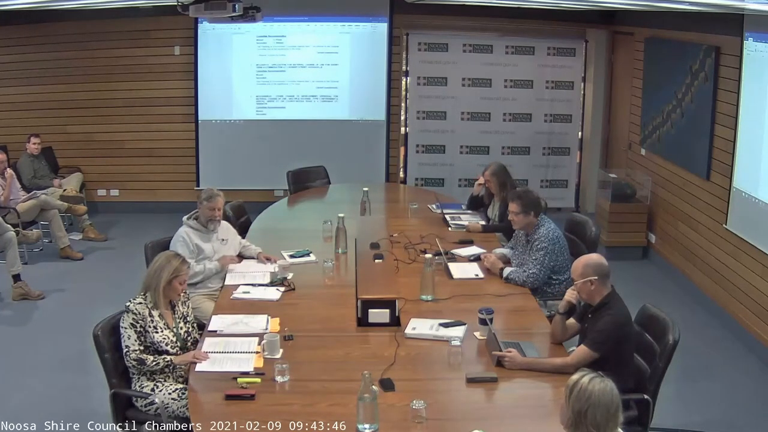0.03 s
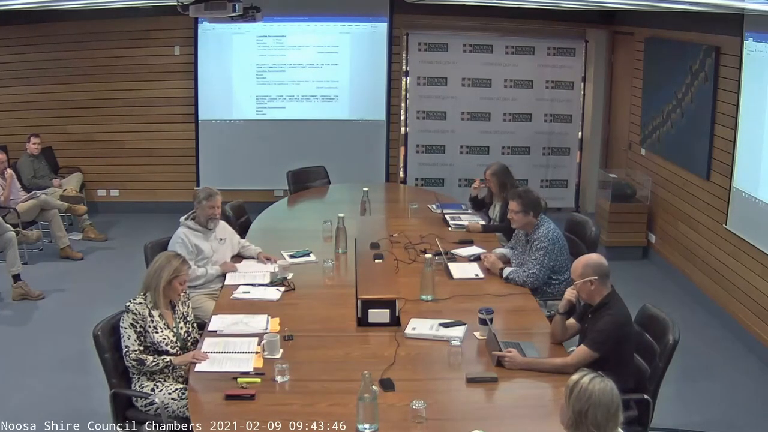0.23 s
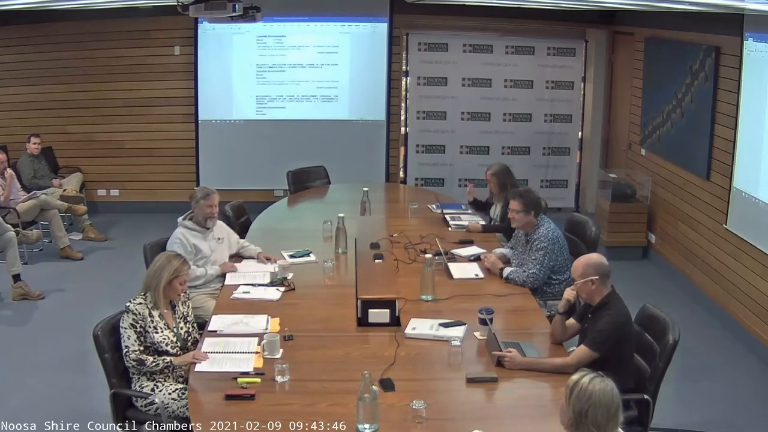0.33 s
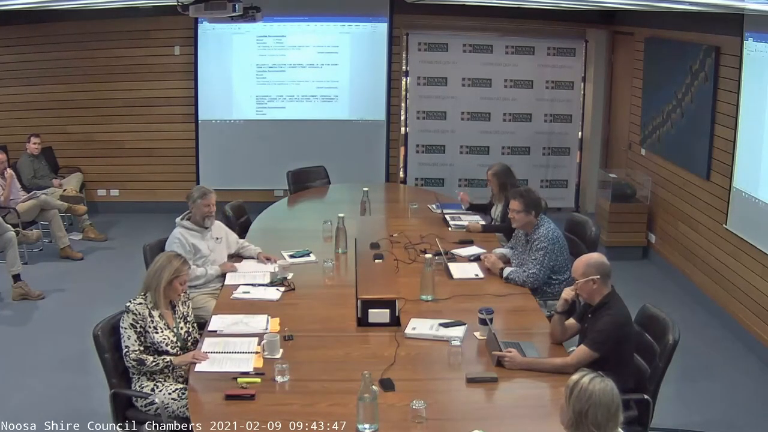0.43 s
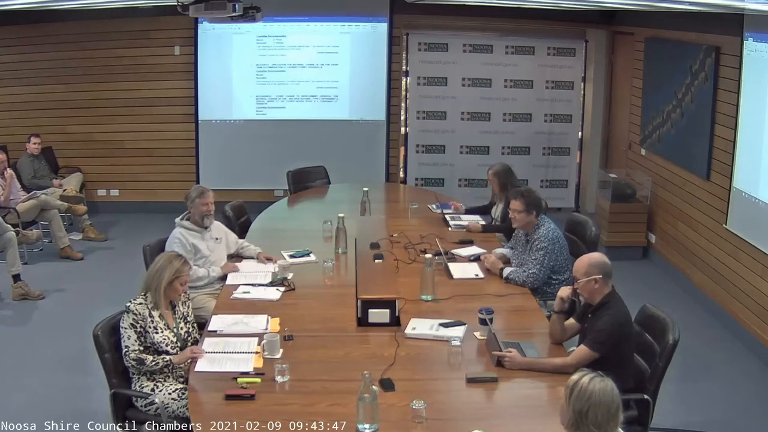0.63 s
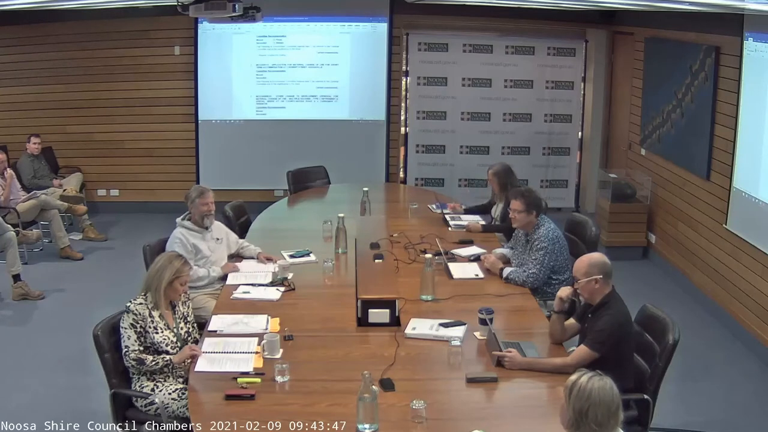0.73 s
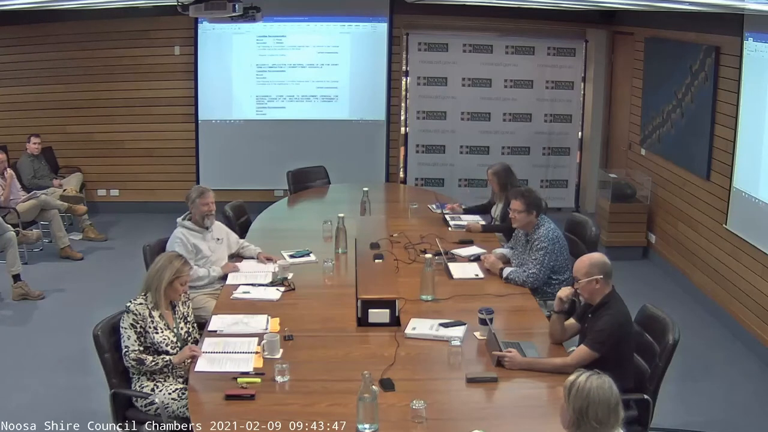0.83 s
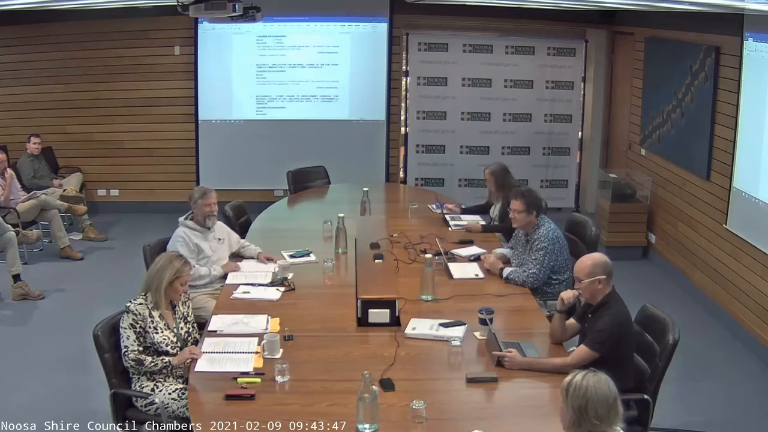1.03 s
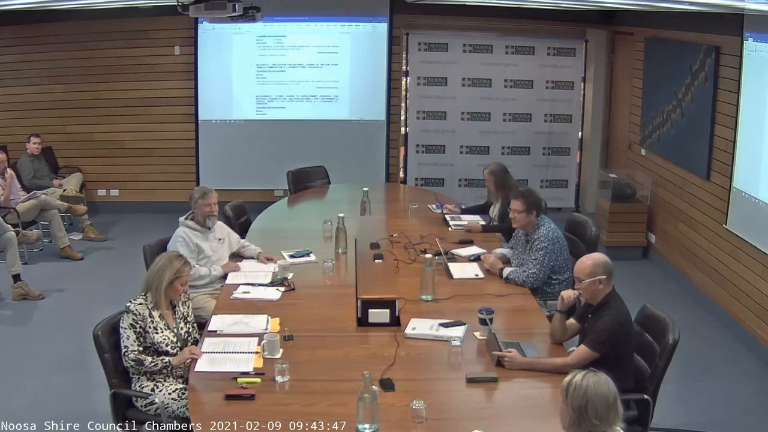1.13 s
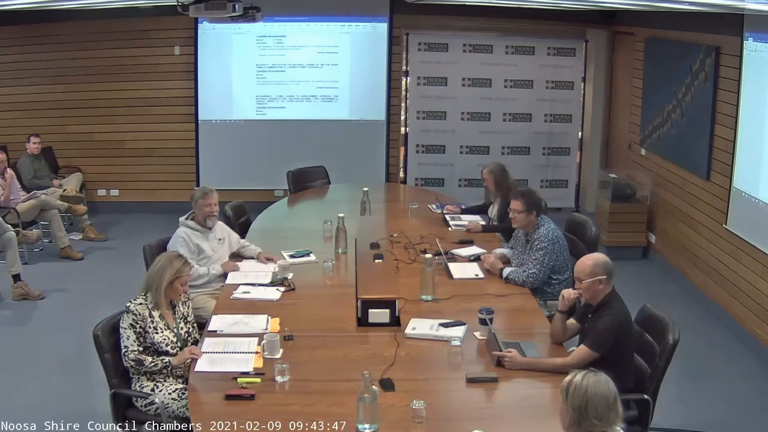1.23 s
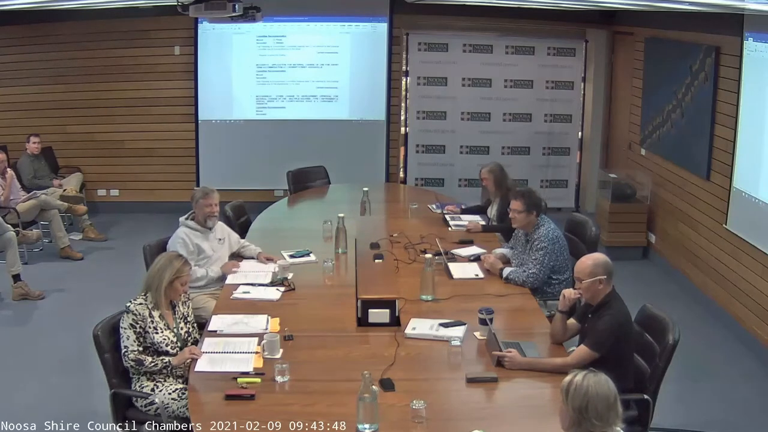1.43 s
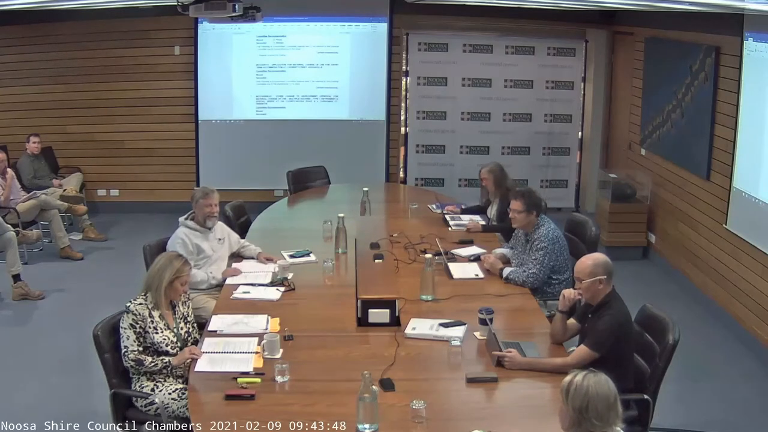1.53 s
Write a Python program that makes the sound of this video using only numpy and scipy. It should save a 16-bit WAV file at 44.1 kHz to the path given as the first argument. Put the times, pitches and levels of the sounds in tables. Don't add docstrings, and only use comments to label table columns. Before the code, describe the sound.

Paper pages handled close to the microphone in a panelled meeting room: a dull hand rub, a burst of sharp crackles as a page buckles and flops, a raspy slide, then a soft tap and scrape.

```python
import sys
import numpy as np
from scipy import signal
from scipy.fft import rfft, irfft
from scipy.io import wavfile
from scipy.ndimage import uniform_filter1d

SR = 44100
rng = np.random.default_rng(int(sys.argv[2]) if len(sys.argv) > 2 else 0)


def decibels_to_gain(level_db):
    exponent = np.asarray(level_db, float) / 20
    return 10 ** exponent


def unload_wav(signal):
    wavfile.write(
        sys.argv[1],
        SR,
        np.round(np.clip(np.atleast_2d(signal).T, -1, 1) * 32767).astype(np.int16),
    )


N = 70560

EDGES = 12 * 2 ** np.arange(0, 10.6, 1 / 3)
CENTRES = np.sqrt(EDGES[1:] * EDGES[:-1])

# f/Hz, density/dB per Hz
CREASE_COLOUR = [(150, -52.5), (250, -18), (760, 0.5), (1640, -9.5), (2050, -2), (4300, -7), (5200, -11),
                 (7300, -10), (11000, -24.5), (15000, -38.5)]
# f/Hz, density/dB per Hz
PILE_COLOUR = [(240, -50), (500, -16.5), (1000, -0.5), (1360, -8.5), (1630, -2), (2480, -12), (5000, -15),
               (5700, -35.5), (7100, -34), (7700, -67)]
# f/Hz, density/dB per Hz
SLIDING_COLOUR = [(290, -35), (500, -10), (700, -19), (923, -2), (1300, -3.5), (2940, 1), (6500, -6),
                  (9480, -24), (12200, -25), (14000, -62)]


def at_hz(points, hz):
    points = np.array(points)
    return np.interp(np.log(hz), np.log(points[:, 0]), points[:, 1])


def rms_one(x):
    return x / np.sqrt(np.mean(x ** 2) + 1e-20)


def in_time(rows, column):
    rows = np.array(rows)
    return np.interp(np.arange(N) / SR, rows[:, 0], rows[:, column], left=-140, right=-140)


def swell(s, db, rise, fall_db):
    t = np.maximum(np.arange(N) / SR - s, 0)
    return decibels_to_gain(db - fall_db * t) * np.clip(t / rise, 0, 1)


def band(x, k):
    run_in = 8192
    sos = signal.butter(4, EDGES[k:k + 2], "band", fs=SR, output="sos")
    return signal.sosfilt(sos, np.concatenate([x[-run_in:], x]))[run_in:]


def bank(sources):
    return [band(sources[k % 2], k) for k in range(len(CENTRES))]


def drift(rate):
    step = 40
    r = np.exp(-2 * np.pi * rate * step / SR)
    white = rng.standard_normal(N // step + 2002)
    slow = signal.lfilter([1], [1, -2 * r, r * r], white)[2000:]
    return np.interp(np.arange(N) / step, np.arange(len(slow)), rms_one(slow))


def coloured(bands, colour, patchy_db=0, top_hz=SR):
    top_fall, shared_flicker = 48.5, .7
    out, power, together = 0, 0, drift(30)
    for k, hz in enumerate(CENTRES):
        if colour[0][0] <= hz <= colour[-1][0]:
            octaves_over = np.maximum(np.log2(hz / top_hz), 0)
            gain = decibels_to_gain(at_hz(colour, hz) - top_fall * octaves_over)
            flicker = decibels_to_gain(patchy_db * (shared_flicker * together + drift(38)))
            out = out + gain * flicker * bands[k]
            power = power + gain ** 2 * (EDGES[k + 1] - EDGES[k]) * 2 / SR
    return out / np.sqrt(power)


def sing(rows, width_hz):
    hz = np.interp(np.arange(N) / SR, *np.array(rows)[:, :2].T)
    carrier = np.exp(2j * np.pi * np.cumsum(hz) / SR)
    sos = signal.butter(2, width_hz / 2, fs=SR, output="sos")
    slow = signal.sosfilt(sos, rng.standard_normal((2, N)))
    tone = np.real((slow[0] + 1j * slow[1]) * carrier)
    return decibels_to_gain(in_time(rows, 2)) * rms_one(tone)


def snaps(rows, colour):
    boost_db, boost_width_oct = 9.5, 0.23
    evenness = .8
    crisp_db, crisp_hz, weak_dulling = -12, 5000, .7
    out, size = np.zeros(N + 2048), 1024
    t = np.arange(size) / SR
    hz = np.maximum(np.fft.rfftfreq(2 * size, 1 / SR), 20)
    for (s, db, pitch_hz, length), noise in zip(rows, rng.standard_normal((len(rows), size))):
        off_pitch = np.log2(hz / pitch_hz) / boost_width_oct
        level = at_hz(colour, hz) + boost_db * np.exp(-.5 * off_pitch ** 2)
        raw = rfft(noise * t * np.exp(-2 * t / length), 2 * size)
        level = level - evenness * 10 * np.log10(uniform_filter1d(np.abs(raw) ** 2, size=9))
        octaves_over = np.maximum(np.log2(hz / max(crisp_hz, pitch_hz)), 0)
        level = level - weak_dulling * np.clip(crisp_db - db, 0, 20) * octaves_over
        cepstrum = irfft(level * np.log(10) / 20)
        cepstrum[1:size] *= 2
        cepstrum[size + 1:] = 0
        burst = irfft(raw * np.exp(rfft(cepstrum)))
        start = int(s * SR)
        out[start:start + 2 * size] += decibels_to_gain(db) * burst / np.abs(burst).max()
    return out[:N]


def grains():
    clicks_per_s, spread_db, click_share = 3800, 4, 0.19
    sizes = decibels_to_gain(spread_db * np.minimum(rng.exponential(1, N), 5)) * rng.choice([-1, 1], N)
    clicks = rms_one(sizes * (rng.random(N) < clicks_per_s / SR))
    return np.sqrt(click_share) * clicks + np.sqrt(1 - click_share) * rng.standard_normal((2, N))


def ventilation(noise):
    # t/s, level/dB
    rumble_curve = [(0, -43), (.04, -48.5), (.12, -51), (.226, -59), (.3, -53.5), (.53, -55.5), (.64, -61),
                    (.78, -53), (.91, -54), (1.0, -52), (1.06, -51.5), (1.2, -60.5), (1.5, -51), (1.6, -50)]
    # f/Hz, density/dB per Hz
    rumble_colour = [(16, -30), (24, -8), (36, 3), (70, -11), (130, -21), (236, -31), (400, -42),
                     (700, -60)]
    # f/Hz, density/dB per Hz
    hiss_colour = [(180, -36), (300, -8), (990, -20), (1500, -28), (6000, -49), (9000, -38.5), (15000, -47)]
    rumble = decibels_to_gain(in_time(rumble_curve, 1)) * coloured(noise, rumble_colour)
    return rumble + decibels_to_gain(-79.5) * coloured(noise, hiss_colour, patchy_db=.4)


def first_rub(noise):
    # t/s, level/dB
    rub_curve = [(0.0, -52), (0.052, -51), (0.138, -69.5), (.17, -70), (.21, -71)]
    # f/Hz, density/dB per Hz
    rub_colour = [(100, -23), (200, -2.5), (600, -8.5), (1000, -0.5), (1500, -6.5), (2100, -18),
                  (3560, -33), (6500, -40.5), (8000, -67)]
    return decibels_to_gain(in_time(rub_curve, 1)) * coloured(noise, rub_colour)


def flick(texture):
    # t/s, level/dB
    flick_curve = [(.098, -106), (.118, -60.5), (.135, -54.5), (.15, -67), (.2, -75.5), (.212, -77.5)]
    # f/Hz, density/dB per Hz
    flick_colour = [(1290, -49.5), (2200, -10), (2820, -15.5), (3890, -7.5), (9180, -2), (12700, -8.5),
                    (15000, -44.5)]
    return decibels_to_gain(in_time(flick_curve, 1)) * coloured(texture, flick_colour, patchy_db=0.5)


def bend(noise):
    # t/s, level/dB
    bend_curve = [(.13, -80), (0.156, -64.5), (0.206, -58.5), (.215, -53)]
    return decibels_to_gain(in_time(bend_curve, 1)) * coloured(noise, PILE_COLOUR)


def crease_snaps():
    # t/s, peak level/dB, main pitch f/Hz, burst length/s
    crease_events = [(.2129, -15, 3840, 0.0019), (.2151, -12.5, 4200, 0.0014), (.2152, -19.5, 1030, 0.0038),
                     (.2222, -21.5, 990, 0.0028), (.2228, -24.5, 3900, 0.0033),
                     (.2270, -33.5, 2900, 0.0011), (.2315, -23.5, 4200, 0.0022),
                     (.2345, -14.5, 4220, 0.0017), (.2388, -16.5, 1480, 0.0019), (.2460, -27, 950, 0.00093),
                     (.2500, -29.5, 2980, 0.00093), (.2600, -18, 3900, 0.0019), (.2645, -31, 3800, 0.0029),
                     (.2695, -32.5, 2250, 0.0012), (.2736, -22, 5940, 0.0016), (.2800, -34, 4000, 0.0036),
                     (.2965, -30.5, 4100, 0.003), (.3030, -29, 3600, 0.002), (.352, -36.5, 4060, 0.0067)]
    return snaps(crease_events, CREASE_COLOUR)


def crumple(texture):
    # t/s, level/dB, rise/s, fall/dB per s
    after_snaps = (.214, -36, .003, 150)
    # t/s, level/dB, rise/s, fall/dB per s
    flop_swell = (.297, -40, .008, 220)
    # t/s, level/dB, rise/s, fall/dB per s
    after_tap = (1.411, -49, .003, 110)
    # f/Hz, density/dB per Hz
    flop_colour = [(130, -40), (220, -9), (400, 0), (700, -4), (950, -6), (1700, -6), (2500, -12),
                   (4000, -30)]
    since = np.clip(np.arange(N) / SR - after_snaps[0], 0, .25)
    top_hz = 15000 * 2 ** (-2.5 * since)
    creasing = swell(*after_snaps) * coloured(texture, CREASE_COLOUR, patchy_db=2.2, top_hz=top_hz)
    flop = swell(*flop_swell) * coloured(texture, flop_colour)
    settling = swell(*after_tap) * coloured(texture, PILE_COLOUR, patchy_db=2.2)
    return creasing + flop + settling


def flop_snaps():
    # t/s, peak level/dB, main pitch f/Hz, burst length/s
    flop_events = [(.2995, -34, 706, 0.0023), (.3035, -40, 1750, 0.0045), (.3040, -34, 377, 0.0056),
                   (.3095, -39.5, 1760, 0.005), (.3128, -36.5, 1010, 0.0019), (.3235, -42, 1390, .002),
                   (.328, -33, 1570, 0.0037), (.3315, -34, 1010, 0.0043), (.350, -36.5, 1740, 0.0022)]
    return snaps(flop_events, PILE_COLOUR)


def slide(texture):
    # t/s, level/dB, top of band f/Hz
    slide_curve = [(.582, -106, 7180), (.587, -75.5, 7100), (.645, -77, 6920), (.662, -61.5, 12500),
                   (.697, -55.5, 12500), (.78, -50.5, 12600), (.88, -50.5, 10000), (.96, -55.5, 8600),
                   (1.0, -60, 7760), (1.03, -54, 8840), (1.1, -57.5, 5250), (1.135, -65.5, 4620),
                   (1.2, -93, 4500), (1.24, -89, 3500)]
    # t/s, level/dB, top of band f/Hz
    settle_curve = [(1.245, -75, 3560), (1.291, -73.5, 3660), (1.3, -64.5, 12200), (1.35, -64, 9970),
                    (1.401, -65.5, 4500), (1.5, -90.5, 6500), (1.54, -91, 6800), (1.559, -59, 9500),
                    (1.6, -73, 9500)]
    # t/s, pitch f/Hz, level/dB
    start_squeak = [(.581, 1800, -95), (.586, 1794, -76.5), (.645, 1714, -75), (.66, 1680, -92)]
    # t/s, pitch f/Hz, level/dB
    sheet_song = [(.655, 2900, -92), (.665, 2900, -74), (.75, 2950, -77), (.78, 2850, -74),
                  (.83, 2900, -53), (.89, 2900, -55), (.93, 2880, -66), (1.0, 2850, -66)]
    points = slide_curve + settle_curve
    top_hz = np.interp(np.arange(N) / SR, *np.array(points)[:, [0, 2]].T)
    drag = decibels_to_gain(in_time(points, 1)) * coloured(texture, SLIDING_COLOUR, top_hz=top_hz)
    return drag + sing(sheet_song, width_hz=250) + sing(start_squeak, width_hz=110)


def catches():
    # t/s, peak level/dB
    catch_events = [(0.6615, -48.5), (0.6827, -51), (0.693, -42.5), (0.699, -51), (0.71, -49),
                    (0.7234, -41), (.7330, -57), (0.754, -42.5), (0.759, -55), (0.7847, -44.5),
                    (.7890, -61), (0.809, -42), (0.818, -49), (0.836, -48)]
    shape = sum(swell(s, db - 2, rise=0.0032, fall_db=13.4 / 0.009) for s, db in catch_events)
    soft = signal.lfilter(*signal.butter(2, 6500, fs=SR), rng.standard_normal(N))
    sos = signal.butter(6, [5030, 11700], "band", fs=SR, output="sos")
    return shape * rms_one(signal.sosfilt(sos, soft))


def fibre_snaps():
    # t/s, peak level/dB, main pitch f/Hz, burst length/s
    fibre_events = [(.691, -45, 4400, .003), (.703, -47, 4360, 0.0078), (.7128, -34, 8300, 0.00076),
                    (.7205, -44, 1070, 0.0037), (.7215, -41, 1740, 0.0017), (.7548, -41.5, 980, .002),
                    (.7715, -35.5, 910, 0.0058), (.7730, -46, 1720, .002), (.7825, -36.5, 5740, 0.0004),
                    (.8000, -46, 2380, 0.00037), (.8060, -47, 2400, 0.0012), (.8062, -39, 930, 0.0059),
                    (.827, -47, 2930, 0.0069), (.8665, -40, 2940, 0.00069), (.8670, -37, 1820, .002),
                    (.8910, -44, 3470, 0.0013)]
    return snaps(fibre_events, SLIDING_COLOUR)


def nudges():
    # t/s, peak level/dB, pitch f/Hz, length/s
    nudge_events = [
        (.895, -41, 70, .045),
    ]
    t, out = np.arange(N) / SR, 0
    for s, db, hz, length in nudge_events:
        window = np.sin(np.pi * np.clip((t - s) / length, 0, 1)) ** 2
        out = out + decibels_to_gain(db) * window * np.sin(2 * np.pi * hz * (t - s))
    return out


def last_rub(noise):
    # t/s, level/dB
    late_curve = [(1.12, -79), (1.228, -64.5), (1.302, -61.5), (1.312, -65), (1.404, -61.5), (1.41, -65),
                  (1.474, -53), (1.504, -68), (1.6, -57)]
    # f/Hz, density/dB per Hz
    late_colour = [(120, -58), (200, -32.5), (447, -11), (650, -12), (863, -15.5), (1050, -11.5),
                   (2290, -24.5), (3000, -23), (3900, -55), (6600, -120)]
    # t/s, pitch f/Hz, level/dB
    low_mode = [(1.15, 438, -81), (1.18, 433, -72), (1.215, 487.4, -65), (1.26, 452, -64.5),
                (1.275, 404, -52), (1.305, 385, -56), (1.325, 390, -80)]
    # t/s, pitch f/Hz, level/dB
    high_mode = [(1.17, 1060, -82), (1.21, 1060, -66), (1.27, 1052, -78), (1.31, 982, -76),
                 (1.33, 965, -92)]
    friction = decibels_to_gain(in_time(late_curve, 1)) * coloured(noise, late_colour, patchy_db=.6)
    return friction + sing(low_mode, width_hz=35) + sing(high_mode, width_hz=44)


def pile_taps():
    # t/s, peak level/dB, main pitch f/Hz, burst length/s
    tap_events = [(1.4105, -30, 1650, 0.0017), (1.4112, -34.5, 1090, 0.0025), (1.4105, -39.5, 6960, .003),
                  (1.4200, -41, 1090, 0.0026), (1.4300, -41.5, 1710, 0.0033), (1.4330, -39, 1620, 0.00059),
                  (1.4365, -51, 1960, 0.0032), (1.4440, -41, 2020, 0.0042), (1.456, -51.5, 2010, 0.0054),
                  (1.466, -66, 1010, 0.0061), (1.478, -61, 1600, .006), (1.571, -50.5, 1000, 0.0028)]
    return snaps(tap_events, PILE_COLOUR)


def chirr():
    # f/Hz, bandwidth/Hz, level/dB
    corner_modes = [
        (3450, 170, -49.5),
        (6740, 470, -51.5),
        (7780, 320, -60.5),
        (10800, 300, -78),
    ]
    noise, whistle = rng.standard_normal(N), 0
    for hz, width, db in corner_modes:
        sos = signal.butter(2, [hz - width / 2, hz + width / 2], "band", fs=SR, output="sos")
        whistle = whistle + decibels_to_gain(db) * rms_one(signal.sosfilt(sos, noise))
    return swell(1.5455, 0, rise=.003, fall_db=10.0 / 0.0097) * whistle


def room(x, level_db):
    # f/Hz, T60/s
    decay_times = [(250, 0.35), (1000, 0.27), (4000, 0.43), (8000, 0.29), (14000, 0.21)]
    t = np.arange(SR // 2) / SR
    white = rng.standard_normal((2, SR // 2))
    tail = 0
    for k, hz in enumerate(CENTRES):
        if hz > 150:
            tail = tail + band(white[k % 2], k) * decibels_to_gain(-60 * t / at_hz(decay_times, hz))
    tail = tail * np.clip(t / 0.00067, 0, 1) ** 2
    return decibels_to_gain(level_db) * signal.fftconvolve(x, tail / np.sqrt(np.sum(tail ** 2)))[:N]


def shimmer(x):
    cells = signal.stft(x, nperseg=1024, noverlap=768)[2]
    chance = uniform_filter1d(rng.standard_normal(cells.shape), size=6, axis=1)
    chance = uniform_filter1d(chance, size=3, axis=0)
    gain = decibels_to_gain(3.2 * rms_one(chance))
    return signal.istft(cells * rms_one(gain), nperseg=1024, noverlap=768)[1][:N]


def scene():
    texture, noise = bank(grains()), bank(rng.standard_normal((2, N)))
    sharp = crease_snaps() + flop_snaps() + fibre_snaps() + pile_taps() + chirr()
    soft, edge = flick(texture) + slide(texture), catches()
    creases = crumple(texture)
    dull = first_rub(noise) + bend(noise) + last_rub(noise)
    reflected = room(sharp + creases + decibels_to_gain(1) * (soft + edge), level_db=-12.5)
    diffuse = soft + creases + dull + reflected
    mix = sharp + edge + shimmer(diffuse) + ventilation(noise) + nudges()
    return mix[None, :]


def top_cut(x):
    return signal.sosfilt(signal.butter(12, 15130, fs=SR, output="sos"), x)


def record(dry):
    return top_cut(dry)


dry = scene()
out = record(dry)
unload_wav(out)
```